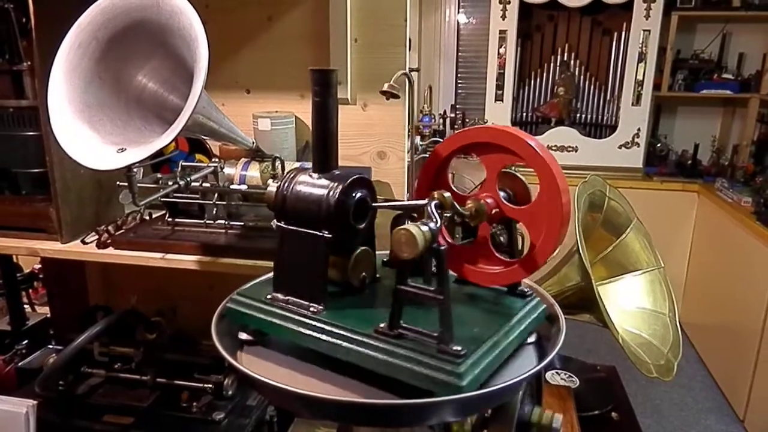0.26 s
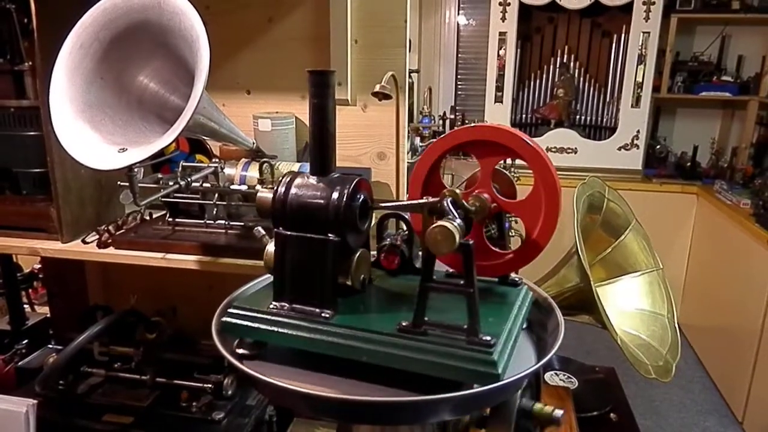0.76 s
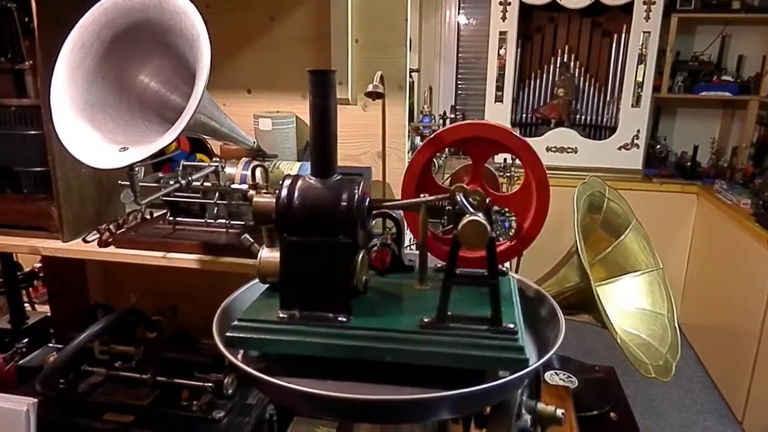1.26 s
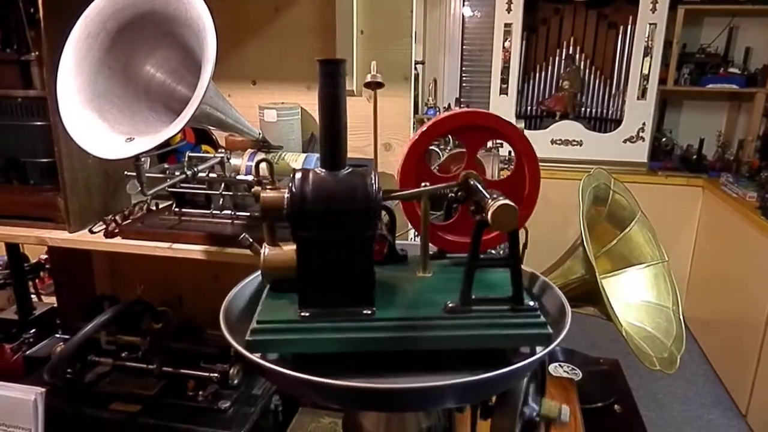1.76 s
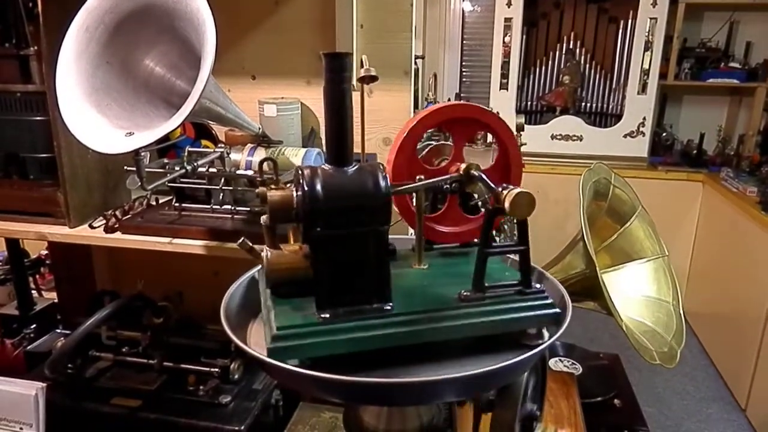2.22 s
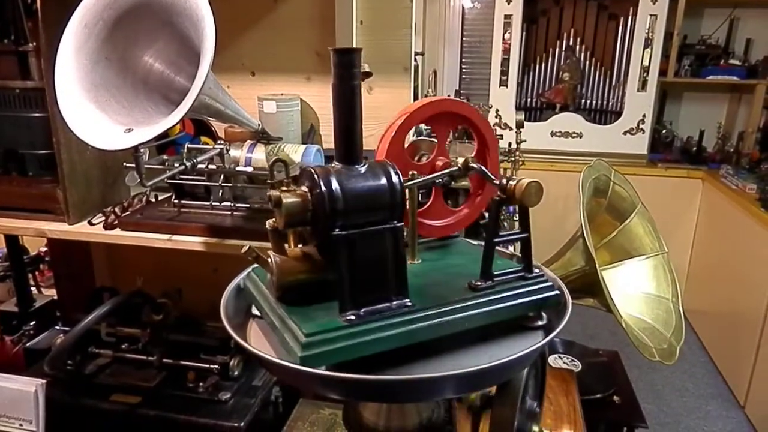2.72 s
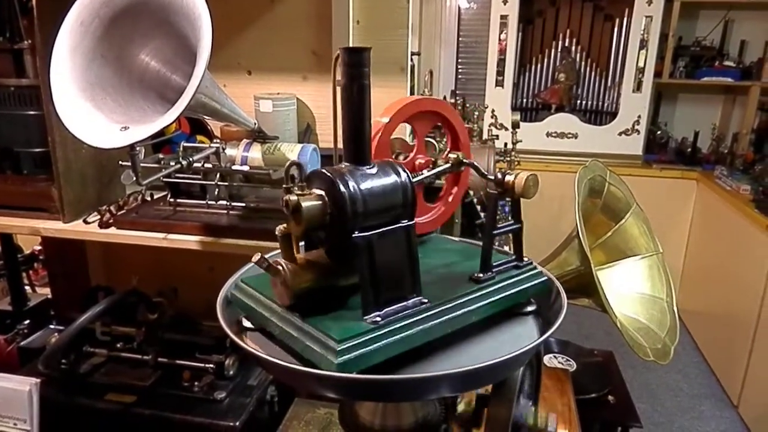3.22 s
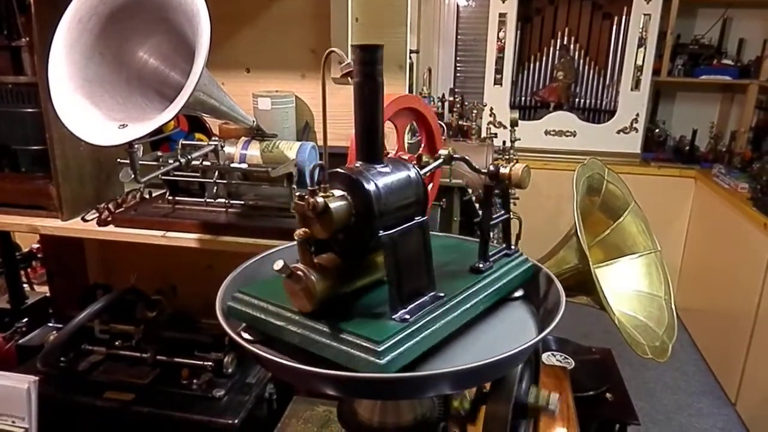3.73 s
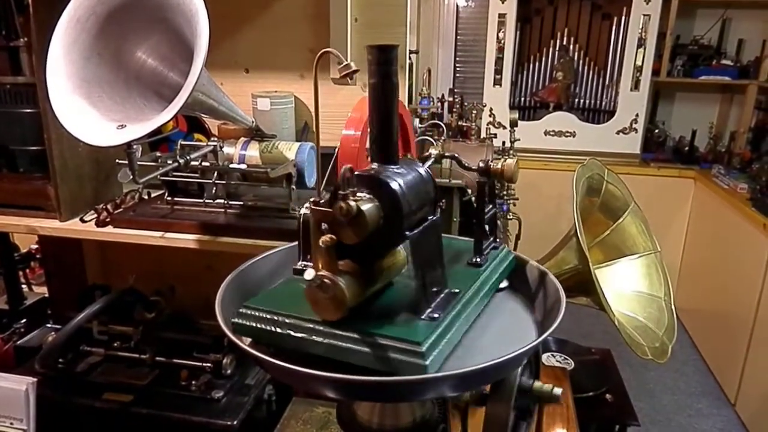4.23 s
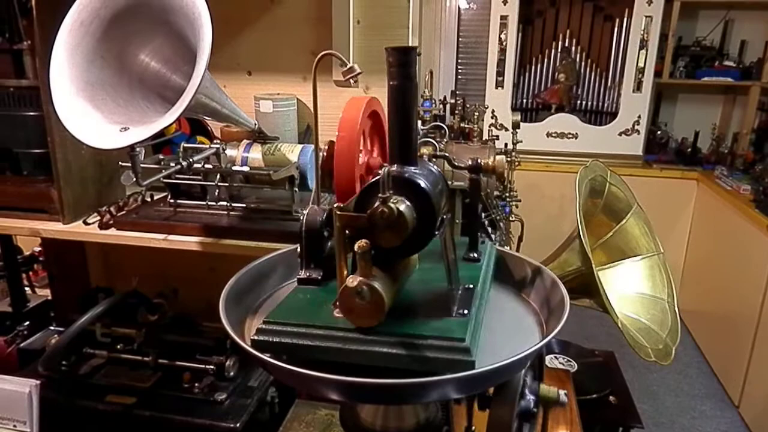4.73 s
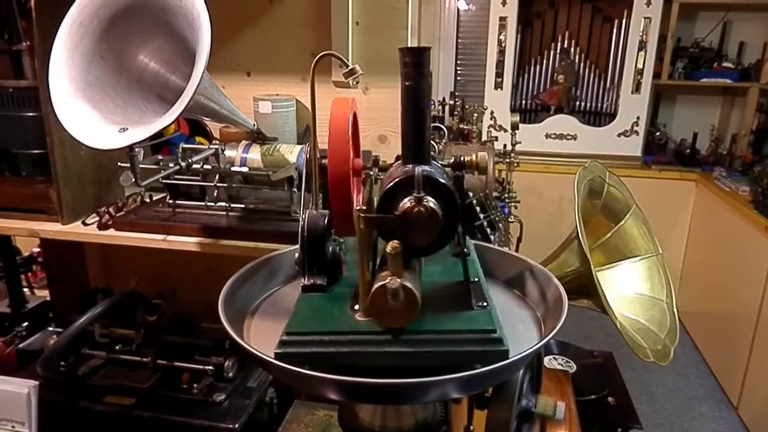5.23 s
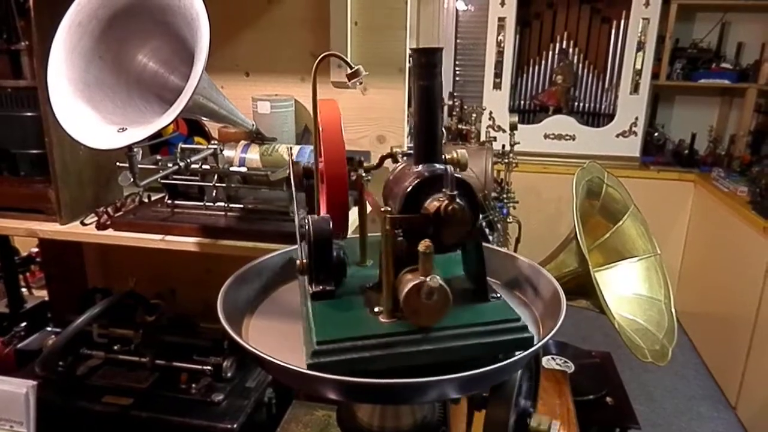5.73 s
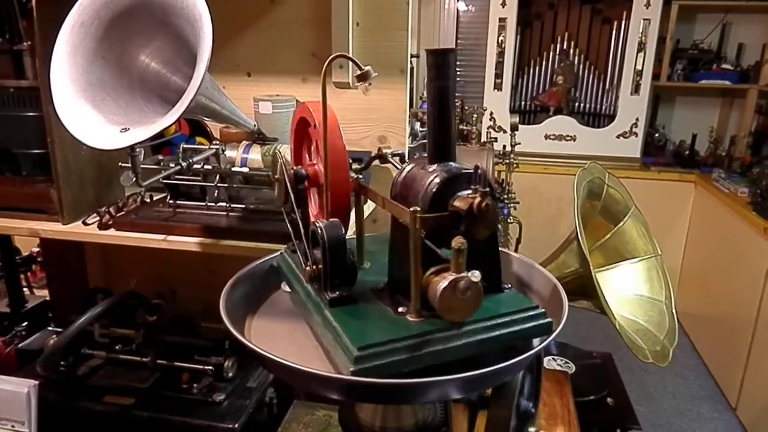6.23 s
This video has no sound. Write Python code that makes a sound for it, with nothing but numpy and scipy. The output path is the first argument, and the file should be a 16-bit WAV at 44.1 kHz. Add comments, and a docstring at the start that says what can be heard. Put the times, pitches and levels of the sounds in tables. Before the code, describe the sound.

A small model engine runs close to the microphone in a workshop, its flywheel making nearly four turns a second. Each turn gives a bright metallic valve snap and a quick cluster of knocks and thumps. After about two seconds, harder hollow knocks from a loose drive join in unevenly. The clatter grows louder, with a few ringing rattles near the end, over a low rumble and faint hiss.

```python
"""A small workshop, one microphone close to a model flame-licker engine on a slow turntable.
The engine makes nearly four turns a second. In each, the flame valve snaps and seats, the rod knocks
in its play and the piston thumps the base; late on, the rod gives a few hard rattles. A loose drive,
probably the turntable's, knocks at its own steady rate. The blows ring in the base and its tray,
then in the room, over a low rumble and a fine hiss."""
import sys
import numpy as np
from scipy import signal
from scipy.fft import rfft, irfft, next_fast_len
from scipy.io import wavfile
from scipy.ndimage import uniform_filter1d

SR = 44100
rng = np.random.default_rng(int(sys.argv[2]) if len(sys.argv) > 2 else 0)


def waveform_to_disk(signal):
    """Save audio, clipped to [-1, 1], as 16-bit WAV at the path in sys.argv[1]."""
    frames = np.transpose(np.atleast_2d(signal))
    scaled = np.clip(frames, -1, 1) * 32767
    samples = np.round(scaled).astype(np.int16)
    wavfile.write(sys.argv[1], SR, samples)


N = 285327
FIRM_DB, SLACK_DB, PIN_DB = 1, 2, 6  # stray from turn to turn: firm contacts, loose ones, light pins

# force spectra of the valve's snap, its seating and a dull clunk: (frequency [Hz], level [dB])
SNAP = [(200, -2), (1200, 20.5), (3300, 8.5), (5000, 9.5), (6000, 9), (7000, 2.5), (8300, 5.5), (9500, 6),
        (10500, 1.5), (11400, -24), (15000, -16)]
SEAT = [(50, -51.5), (200, 22.5), (380, 4), (650, 11.5), (1000, 12.5), (1350, 16.5), (1900, -2), (3300, -5),
        (6000, -9.5), (12000, -64)]
CLUNK = [(60, -14.5), (200, -3.5), (380, -4.5), (500, 12), (620, -2), (800, -4), (1400, -32.5),
         (2500, -41.5), (6000, -66)]
# strength of the snap and of the seating thud, both softer at first: (time [s], level [dB])
SNAP_STRENGTH = [(0, -5), (1.0, -6), (1.7, -0.5), (3, -3), (4.2, -2), (5.3, -4.5), (6.3, -0.5)]
THUD_STRENGTH = [(0, -54), (1.0, -18), (1.5, -5), (3.8, -6.5), (5.6, -1), (6.4, -2.5)]
# modes of the valve and its spring: (frequency [Hz], gain [dB], t60 [s])
VALVE_MODES = [(2154, 10, .13), (3300, 6, .025), (4800, 11, .012), (5587, 17, .19), (6767, 9, .07),
               (7732, 25.5, .17), (10030, 11, .08), (10515, 18, 0.0074)]
# decay of the many small modes of the valve gear: (frequency [Hz], t60 [s])
GEAR_DECAY = [(1000, 0.077), (3000, 0.072), (5000, 0.29), (8000, 0.48), (10500, 0.36)]
def valve():
    """The shutter snaps over the flame port, seats and jolts the cylinder: force and bright ring."""
    times = crank_at(0)
    snap = blows(times, along(SNAP_STRENGTH, times), SNAP, -62.5, chatter_s=.003, chatter=.83)
    seat = blows(times + .0045, 0, SEAT, -52.5, chatter_s=.002475, chatter=.25)
    thud = blows(times + .004924, along(THUD_STRENGTH, times), CLUNK, -47.5, .00605, .29)
    shimmer = gain_of(-6) * scatter(snap, GEAR_DECAY, delay_s=.0016, count=13)
    return snap + seat + thud, gain_of(3) * ring(snap, VALVE_MODES) + shimmer


# where each blow falls after the valve snap: (name, crank angle [turns])
ANGLE = dict(valve=0, tick=.228, rod=.233, rebound=.312, thump=.559, cam=.635, crank=.716, back=.792)
# force spectra of a pin's tick, the rod's knock and a low thump: (frequency [Hz], level [dB])
TICK = [(300, -13), (2500, -11), (4000, -43.5), (7000, -7.5), (9000, -10.5), (11500, 4), (14000, 6),
        (15000, -6), (16000, -12)]
ROD = [(30, -14), (60, -19.5), (180, 14.5), (300, 9), (380, -14), (470, 12.5), (750, -7.5), (950, -13),
       (1300, 3.5), (2000, -21), (3300, -49), (6000, -65), (10000, -52)]
THUMP = [(30, -8.5), (70, -10.5), (130, -6), (250, 7.5), (370, -28.5), (520, -6), (800, -26.5), (1400, -19),
         (2500, -90), (6000, -101)]
def rod():
    """Once a turn the rod crosses its play: a light pin ticks, the rod knocks and rebounds."""
    tick = blows(*stroke(ANGLE["tick"], PIN_DB, swell=-1.27), TICK, -80, .00013, 1.1)
    knock = blows(*accented(*stroke(ANGLE["rod"], FIRM_DB, swell=.032)), ROD, -49.5, .0075, .94)
    clunk = blows(*stroke(ANGLE["rebound"] - .012, FIRM_DB, swell=-.22), CLUNK, -57.5, .0048, .99)
    rebound = blows(*stroke(ANGLE["rebound"], FIRM_DB, swell=1), THUMP, -47, .0078, .18)
    return tick + knock + clunk + rebound


# force spectra of the base rocking and of the piston's squeak: (frequency [Hz], level [dB])
ROCK = [(30, -13), (90, -22.5), (130, -3), (170, -9), (260, -29), (600, -48.5), (3000, -69)]
SQUEAK = [(1500, -35), (2400, -7), (2900, -1.5), (3400, -16.5), (4100, -29.5), (9000, -23)]
def piston():
    """The piston thumps, rocks the base on its feet and squeaks at the end of its stroke."""
    thump = blows(*accented(*stroke(ANGLE["thump"], FIRM_DB, swell=.2)), THUMP, -44.5, .013, .18)
    rock = blows(*stroke(ANGLE["thump"] + .0355, FIRM_DB, swell=-.074), ROCK, -45, .0024, 1)
    squeak = blows(*stroke(ANGLE["cam"] - .005, SLACK_DB, swell=0), SQUEAK, -71, .003, .7)
    return thump + rock + squeak


def cam():
    """The cam strikes once a turn with a bouncing tick and a clunk."""
    tick = blows(*stroke(ANGLE["cam"], PIN_DB, swell=-.3), TICK, -69, .0007, 1.1)
    return tick + blows(crank_at(ANGLE["cam"]) + .003, 0, CLUNK, -55, .00724, 1)


# force spectra of the crank's knock and of the return stroke: (frequency [Hz], level [dB])
CRANK = [(100, -53), (300, 22), (500, 17), (900, 15.5), (1400, 13.5), (2000, -37), (2600, -2.5),
         (4000, -48), (8000, -73)]
RETURN = [(30, -2.5), (80, -7.5), (130, 4.5), (200, 23), (350, 5), (530, 13.5), (750, -13.5), (1300, -39.5),
          (2500, -17.5), (6000, -65), (10000, -100)]
def crank():
    """The crank crosses its play, the base rocks and the return stroke lands."""
    knock = blows(*stroke(ANGLE["crank"], FIRM_DB, swell=.12), CRANK, -57.5, .007, .97)
    rock = blows(*stroke(ANGLE["back"] - .03, FIRM_DB, swell=-.56), ROCK, -54.5, .0021, .27)
    back = blows(*stroke(ANGLE["back"], SLACK_DB, swell=.89), RETURN, -48.5, .00473, 1)
    return knock + rock + back


# force spectrum of the base's hollow knock: (frequency [Hz], level [dB])
HOLLOW = [(200, -10), (460, -16), (600, -24), (760, 12), (950, -0.5), (1200, -16), (2500, -32.5),
          (8000, -82)]
def afterknocks():
    """The base answers valve and rod with a hollow knock, and rocks on after the return stroke."""
    after_valve = blows(*stroke(.0269, FIRM_DB, swell=-.23), HOLLOW, -61.5, .00163, .042)
    after_rod = blows(*stroke(ANGLE["rod"] + .01827, FIRM_DB, swell=-.28), HOLLOW, -62.5, .00304, .91)
    after_return = blows(*stroke(ANGLE["back"] + .0292, SLACK_DB, swell=.39), THUMP, -57, .01, .22)
    return after_valve + after_rod + after_return


# force spectra of the crank pin's bright click and lighter clinks: (frequency [Hz], level [dB])
CLICK = [(500, -25), (2000, 7), (3500, -5.5), (5000, -4), (7500, -1.5), (10000, -17), (13500, -3),
         (16000, -1)]
CLINK = [(1000, -20), (3500, -9), (4800, -4), (6000, -10), (7300, 1), (8300, -3), (9800, -3), (12000, -12),
         (15000, -25)]
def crank_pin():
    """The crank pin clicks, bounces and rattles each time the rod takes up its play."""
    click = blows(*stroke(ANGLE["tick"] - .002, SLACK_DB, swell=0), CLICK, -68.5, .004, .9)
    clink = blows(*stroke(ANGLE["back"] + .016, SLACK_DB, swell=.5), CLINK, -80, .002, .8)
    rattle = grit(*stroke(ANGLE["rod"] + .03, PIN_DB, swell=.3), CLINK, -79, rise_s=.002, fade_s=.01)
    rattle += grit(*stroke(ANGLE["thump"] - .02, SLACK_DB, swell=.3), CLINK, -78, .003, .006)
    return click + clink + rattle


# force spectra of dry metal grating and of the base shuddering: (frequency [Hz], level [dB])
GRATE = [(300, -9.5), (600, 2.5), (1000, 6.5), (1700, -10.5), (2400, -9.5), (3300, -21.5), (4200, -36.5),
         (7000, -33), (10000, -34.5), (12000, -55)]
SHUDDER = [(80, -22), (150, -4), (280, -1), (370, -5), (480, 3), (600, -3), (750, -16), (1500, -30),
           (4000, -60)]
# how hard the play grates, and the piston as the cylinder swings round: (time [s], level [dB])
PLAY_GRATING = [(0, -5), (1.2, -5), (2.6, 0.5), (3.8, -3.5), (5.4, -1), (6.4, -7)]
PISTON_GRATING = [(0, -16), (1.2, -9), (2.3, -2), (3.9, -6), (4.7, 0.5), (5.4, -14), (6.4, -6)]
def grating():
    """Valve seat, rod, piston and crank grate after they strike, and the base shudders on the tray."""
    valve_s, rod_s = crank_at(ANGLE["valve"]), crank_at(ANGLE["tick"])
    piston_s, crank_s = crank_at(ANGLE["thump"]), crank_at(ANGLE["crank"])
    rod_db, piston_db = along(PLAY_GRATING, rod_s), along(PISTON_GRATING, piston_s)
    grate = (grit(valve_s + .003, along(PLAY_GRATING, valve_s), GRATE, -58, rise_s=.003, fade_s=.011)
             + grit(rod_s, rod_db, GRATE, -59.5, rise_s=.003, fade_s=.015)
             + grit(piston_s, piston_db, GRATE, -61.5, rise_s=.0036, fade_s=.026)
             + grit(crank_s, along(PLAY_GRATING, crank_s), GRATE, -65.5, rise_s=.004, fade_s=.016))
    thud_db, heavy_rod_db = along(THUD_STRENGTH, valve_s), accented(rod_s, rod_db)[1]
    shudder = (grit(valve_s + .004, thud_db, SHUDDER, -55.5, rise_s=.004, fade_s=.018)
               + grit(rod_s + .002, heavy_rod_db, SHUDDER, -56, rise_s=.004, fade_s=.028)
               + grit(piston_s, piston_db, SHUDDER, -56, rise_s=.002, fade_s=.018))
    return grate + shudder


# the rod's hard rattles: (time [s], level [dB])
RATTLES = [(5.141, -17), (5.411, -5), (5.678, -15), (6.214, -14)]
# their force spectrum: (frequency [Hz], level [dB])
RATTLE_SPECTRUM = [(200, -3), (500, -2), (900, -2), (1600, -25), (2400, -12), (4000, -33), (8000, -47),
                   (12000, -65)]
# modes of the tray's rim: (frequency [Hz], gain [dB], t60 [s])
RIM_MODES = [(545, 15, 0.15), (766, -8, 0.15), (804, 16, 0.17), (1560, 24, 0.18), (1690, 23, 0.13),
             (1810, 15.5, 0.21)]
def hard_rattles():
    """The rod now and then rattles hard: its force, and the ring of the tray's rim."""
    times, strength_db = np.transpose(RATTLES)
    force = blows(times, strength_db, RATTLE_SPECTRUM, -49.5, chatter_s=.0076, chatter=.64, count=9)
    force += grit(times, strength_db, GRATE, -52, rise_s=.0017, fade_s=.0091)
    return force, ring(force, RIM_MODES)


# the drive's ordinary knocks, growing unevenly: (time [s], level [dB])
DRIVE_STRENGTH = [(0, -19), (1.8, -14.5), (2.6, -9), (3.4, -12), (4, -6.5), (5, -2.5), (5.6, -16), (6.4, 0)]
# its hard knocks, on the beat or halfway between: (time [s], level [dB])
HARD_KNOCKS = [(2.197, -5), (2.478, -1.5), (2.611, -5), (2.809, -5), (3.144, -1), (3.342, -1), (3.409, 0),
               (3.542, 1.5), (3.677, -1), (3.737, -5), (3.88, -6), (4.414, 4), (4.544, 1), (4.746, -5),
               (5.278, 0.5), (5.545, 5), (5.678, 0), (5.812, 3), (5.945, 3), (6.032, -5), (6.078, 4),
               (6.362, -1), (6.412, -9)]
# force spectrum of a knock: (frequency [Hz], level [dB])
DRIVE_KNOCK = [(20, -45), (80, -18), (200, -3), (450, -2), (650, 3), (900, 0), (1400, -11), (2000, -18),
               (3000, -27), (3900, -40), (4800, -32), (6000, -44), (7300, -33), (9000, -50)]
# its hollow clack and thin ring: (frequency [Hz], gain [dB], t60 [s])
DRIVE_MODES = [(690, 8, .018), (900, 5, .014), (2400, 4, .04), (4820, 13, 0.03), (7430, 17, .04),
               (8700, 12, 0.035)]
def drive(first_s=.0759, beat_s=.1334):
    """The loose drive knocks on a steady beat and drops back with a clunk: force and direct sound."""
    beats = np.arange(first_s, N / SR, beat_s)
    hard_s, hard_db = np.transpose(HARD_KNOCKS)
    soft_db = along(DRIVE_STRENGTH, beats) + 1.5 * rng.uniform(-1, 1, len(beats))
    soft = abs(beats[:, None] - hard_s).min(1) > beat_s / 4  # beats with no hard knock
    times, strength_db = np.r_[beats[soft], hard_s], np.r_[soft_db[soft], hard_db]
    knocks = blows(times, strength_db, DRIVE_KNOCK, -54.5, chatter_s=.003, chatter=.5)
    knocks += grit(times, strength_db, GRATE, -62.5, rise_s=.0014, fade_s=.01)
    clunks = blows(times + .008904, strength_db, CLUNK, -56, chatter_s=.0017, chatter=.28)
    return gain_of(-8) * knocks + clunks, knocks + ring(knocks, DRIVE_MODES)


# friction spectra of piston, cam and bearings: (frequency [Hz], level [dB])
SCRAPE = [(1000, 6.5), (2000, -11), (2700, 2), (3300, -11), (4000, -20.5), (8000, -17.5), (11500, -9),
          (14000, -46)]
LIFT = [(300, 2.5), (500, -10.5), (1000, -1), (2000, -22), (3400, -17), (5000, -20), (10000, -28),
        (12000, -42)]
RUMBLE = [(25, -7.5), (60, -1), (130, -3), (220, 4), (400, -13), (900, -36.5), (2000, -29), (4000, -101),
          (10000, -87)]
def friction():
    """The piston rubs in its bore both ways, the cam lifts the valve lever and the bearings rumble."""
    inward = rub(.608, SCRAPE, -68, width_s=.023)
    outward = rub(.2, SCRAPE, -76, width_s=.027)
    lift = rub(.025, LIFT, -62, width_s=.017)
    bearings = gain_of(-58.5 + .27 * along(SWELL, np.arange(N) / SR)) * noise(RUMBLE)
    return inward + outward + lift + bearings


# modes of the base and tray: (frequency [Hz], gain [dB], t60 [s])
BASE_MODES = [(100, -14, 0.26), (134.7, 8, 0.14), (180.3, -0.5, 0.11), (203.9, 6, 0.2), (237.1, 6, 0.29),
              (281.8, 6.5, 0.15), (339.3, 10, 0.034), (409, 1.5, 0.092), (456, 12, .1), (490, 6, .06),
              (528, 4, .08), (562, 7, .12), (732, 10, .08), (795, 4, .07), (932, 11.5, .075),
              (975, -3, 0.058), (1172, 0.5, 0.059), (1433, -8.5, 0.18), (1627, 1.5, 0.045),
              (2054, -0.5, 0.21), (2280, 4, 0.06), (2644, 0, 0.094), (3388, 4, 0.016)]
# decay of the frame's dense small modes: (frequency [Hz], t60 [s])
FRAME_DECAY = [(400, 0.023), (1500, 0.029), (5000, 0.021), (12000, 0.012)]
def body(force):
    """Base, tray and frame turn force into sound; the frame's small parts have no modes in the bass."""
    upper = signal.sosfilt(signal.butter(2, 550, "high", fs=SR, output="sos"), force)
    base = gain_of(-12) * force + ring(force, BASE_MODES)
    return base + gain_of(-2.5) * scatter(upper, FRAME_DECAY, delay_s=.0003, count=13)


# decay of the workshop: (frequency [Hz], t60 [s])
ROOM_DECAY = [(100, 0.3), (500, 0.25), (1000, .18), (2000, 0.21), (7000, 0.11), (14000, 0.05)]
def room(sound):
    """Echoes off the near walls reach the microphone just after the direct sound."""
    return gain_of(-6) * scatter(sound, ROOM_DECAY, delay_s=.005, count=9)


# spectrum of the workshop's steady room tone: (frequency [Hz], level [dB])
ROOM_TONE = [(20, 25), (36, 2), (53, 19), (120, 8), (400, 18), (1000, 3), (3000, -37), (8000, -34.5),
             (12000, -31.5), (13500, -16.5), (14700, -12), (16000, -14.5)]
def background():
    """Room rumble, fine hiss and a faint high whine lie behind the engine."""
    whine = gain_of(-91) * np.sqrt(2) * np.sin(2 * np.pi * 14955 * np.arange(N) / SR)
    return gain_of(-58.5) * noise(ROOM_TONE) + whine


# the flywheel slows a little and settles: (time [s], speed [turns/s])
SPEED = [(0, 3.817), (1.86, 3.752), (4, 3.7175), (6.2, 3.719)]
def crank_at(phase, first_snap_s=.0123):
    """The times at which each turn reaches this share of a revolution after the valve snap."""
    starts = [first_snap_s]
    while starts[-1] < N / SR:
        starts.append(starts[-1] + 1 / along(SPEED, starts[-1]))
    return starts[:-1] + phase * np.diff(starts)


# swell as the turntable brings the cylinder round to the microphone: (time [s], level [dB])
SWELL = [(0, -6.5), (1.2, -6.5), (2.5, -3), (4, -4), (5.4, 5), (6.4, 2.5)]
def stroke(phase, spread_db, swell):
    """Times and strengths (dB) of a once-a-turn blow: a signed share of the swell, plus chance."""
    times = crank_at(phase)
    return times, swell * along(SWELL, times) + spread_db * rng.uniform(-1, 1, len(times))


# strokes on which rod or piston hits harder: (time [s], extra level [dB])
HEAVY_STROKES = [(3.615, 4), (4.153, 2.5), (4.69, 4.5), (4.872, 6.5), (5.411, 4), (5.678, 4), (6.035, 2),
                 (6.304, 4)]
def accented(times, strength_db):
    """Adds the extra force of the heavy strokes to the blows that fall on them."""
    for s, extra_db in HEAVY_STROKES:
        strength_db = strength_db + extra_db * (abs(times - s) < .012)
    return times, strength_db


def blows(times, strength_db, spectrum, level_db, chatter_s, chatter, count=6, size=4096):
    """Force pulses, each trailed by a rattle across the play: chatter_s spaces it, chatter scales it."""
    log_gain = np.log(gain_of(read(spectrum, abs(np.fft.fftfreq(size, 1 / SR)))))
    pulse = np.fft.ifft(np.exp(np.conj(signal.hilbert(log_gain)))).real[:size // 2]  # minimum phase
    pulse *= np.sqrt(SR / 100 / np.sum(pulse ** 2))  # rms 1 over 10 ms
    bounce = np.arange(count)
    gap_stray, push_stray = rng.standard_normal((len(times), 2, count)).transpose(1, 0, 2)
    # each crossing is shorter and weaker than the last, and lands on the opposite side
    gaps = chatter_s / 2 * .72 ** bounce * (1 + .09 * gap_stray)
    lag = np.cumsum(gaps, 1) - gaps
    push = chatter * (-.7) ** bounce * (1 + .2 * push_stray)
    push[:, 0] = 1
    push *= (gain_of(level_db + strength_db) / np.linalg.norm(push, axis=1))[:, None]
    return place(pulse, times[:, None] + lag, push)


def grit(times, strength_db, spectrum, level_db, rise_s, fade_s, contacts_per_s=2500, spread_db=4):
    """Showers of tiny contacts that swell and die after each blow."""
    t = np.arange(SR // 6) / SR
    shape = (1 - np.exp(-t / rise_s)) * np.exp(-t / fade_s)
    pressure = place(shape / shape.max(), times, gain_of(strength_db))
    contacts = (rng.random(N) < contacts_per_s / SR) * rng.choice([-1, 1], N)
    sizes = gain_of(spread_db * rng.standard_normal(N))
    return gain_of(level_db) * pressure * coloured(contacts * sizes, spectrum)


def rub(phase, spectrum, level_db, width_s, uneven_db=2.5):
    """A short rub around one crank angle that catches and slips unevenly."""
    t, centres = np.arange(N) / SR, crank_at(phase)
    nearest = centres[np.searchsorted((centres[1:] + centres[:-1]) / 2, t)]
    envelope = np.exp(-((t - nearest) / width_s) ** 2)
    grip = unit_rms(uniform_filter1d(rng.standard_normal(N), size=160))
    return gain_of(level_db + uneven_db * grip) * noise(spectrum) * envelope


def ring(force, modes, wander_db=1.5, wander_per_s=8):
    """Damped modes; the force reaches each a little differently from stroke to stroke."""
    t = np.arange(N) / SR
    knots = np.arange(0, N / SR + 1, 1 / wander_per_s)
    sound = 0
    for hz, db, t60 in modes:
        damping, turn = np.log(1000) / abs(t60) / SR, 2 * np.pi * hz / SR
        r = np.exp(-damping)
        resonator = [0, 2 * damping * r * np.sin(turn)], [1, -2 * r * np.cos(turn), r * r]
        reach = np.interp(t, knots, gain_of(db + wander_db * rng.standard_normal(len(knots))))
        sound = sound + signal.lfilter(*resonator, force * reach)
    return sound


def scatter(x, decay, delay_s, count):
    """Dense dying echoes, fading through count patterns as the turntable carries the engine round."""
    hz, t, spectra = signal.stft(rng.standard_normal((count, SR // 2)), SR, nperseg=256)
    tails = signal.istft(spectra * gain_of(-60 * t / read(decay, hz)[:, None]), SR, nperseg=256)[1]
    tails /= np.sqrt(SR * read(decay, 1000) / (2 * np.log(1000)))  # about unit gain at 1 kHz
    tails = np.pad(tails, ((0, 0), (int(delay_s * SR), 0)))
    angle = np.linspace(0, count - 1, N) - np.arange(count)[:, None]
    facing = np.cos(np.pi / 2 * np.clip(angle, -1, 1))
    return signal.oaconvolve(x * facing, tails, axes=1)[:, :N].sum(0)


def place(shape, times, heights):
    """Starts a copy of the shape at each time, scaled by its height."""
    at = np.round(times * SR).astype(int)
    inside = (at >= 0) & (at < N)
    return signal.oaconvolve(np.bincount(at[inside], heights[inside], N), shape)[:N]


def coloured(x, spectrum):
    """Filters by the spectrum and scales to rms 1."""
    size = next_fast_len(N)
    colour = gain_of(read(spectrum, np.fft.rfftfreq(size, 1 / SR)))
    return unit_rms(irfft(rfft(x, size) * colour, size)[:N])


def noise(spectrum):
    """Steady noise of rms 1 with the given spectrum."""
    return coloured(rng.standard_normal(next_fast_len(N)), spectrum)


def read(points, hz):
    """Joins (Hz, value) points on a log-frequency axis."""
    f, value = np.transpose(points)
    return np.interp(np.log(hz + 1), np.log(f + 1), value)


def along(points, s):
    """Joins (s, value) points in time."""
    return np.interp(s, *np.transpose(points))


def gain_of(db):
    """Decibels to amplitude."""
    return 10 ** (np.asarray(db) / 20)


def unit_rms(x):
    """Scales to rms 1."""
    return x / np.sqrt(np.mean(x ** 2) + 1e-20)


def scene():
    """All forces drive the body; its sound and that of valve, rim and drive fill the workshop."""
    valve_force, valve_ring = valve()
    drive_force, drive_sound = drive()
    rattle_force, rim_ring = hard_rattles()
    linkage = rod() + piston() + cam() + crank() + afterknocks() + crank_pin()
    force = valve_force + linkage + grating() + rattle_force + drive_force + friction()
    engine = body(force) + valve_ring + rim_ring + drive_sound
    return (engine + room(engine) + background())[None]


def record(dry):
    """One fixed microphone; the small engine radiates little below 25 Hz, and the recorder stops at 15.8 kHz."""
    thinned = signal.sosfilt(signal.butter(2, 25, "high", fs=SR, output="sos"), dry)
    band_limit = signal.firwin(801, 15800, window=("kaiser", 9), fs=SR)
    return signal.oaconvolve(thinned, band_limit[None], "same")


dry = scene()
out = record(dry)
waveform_to_disk(out)
```